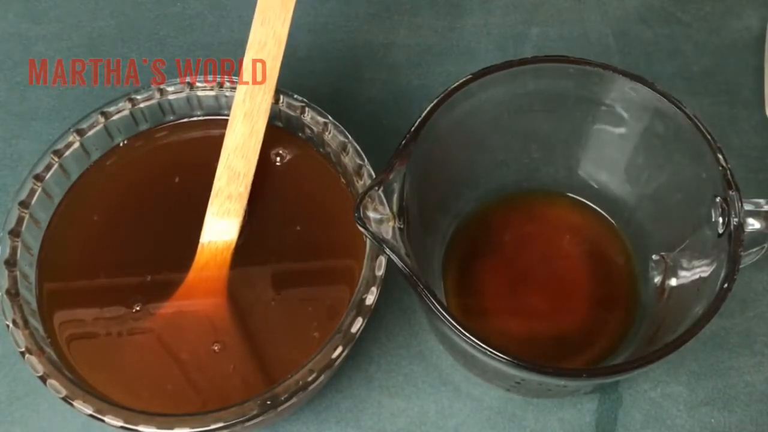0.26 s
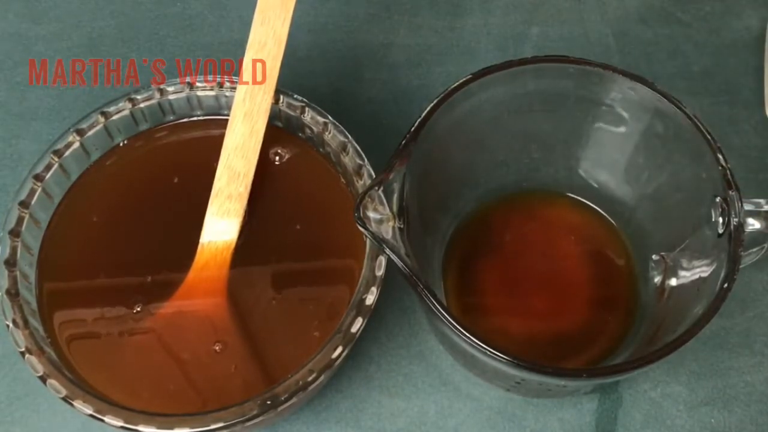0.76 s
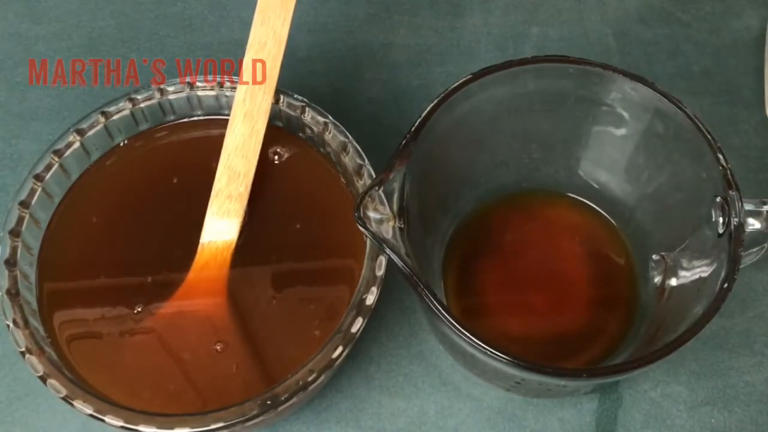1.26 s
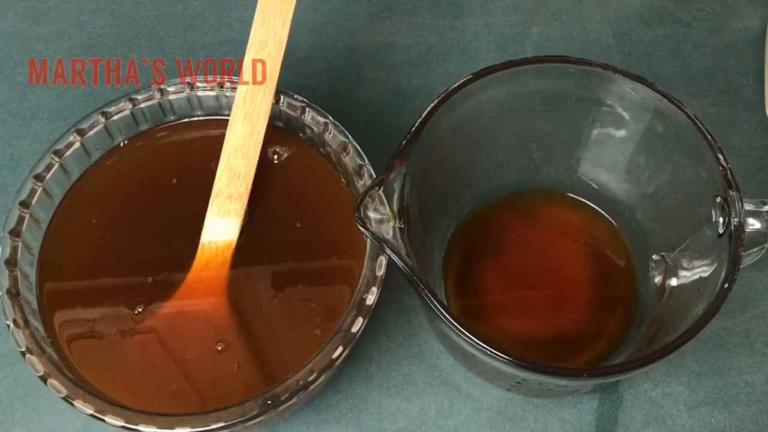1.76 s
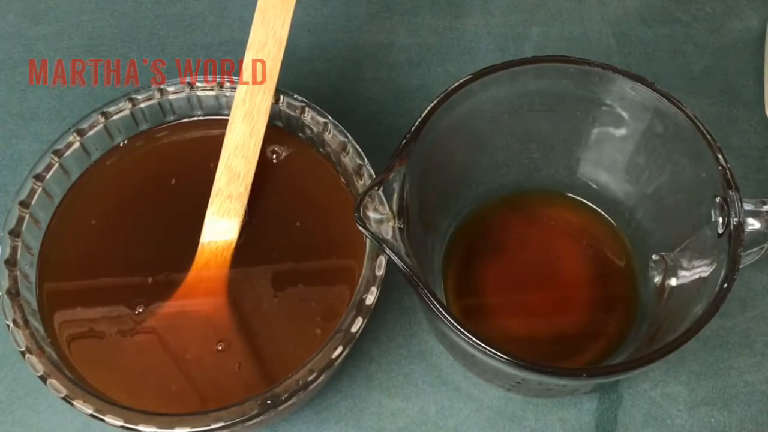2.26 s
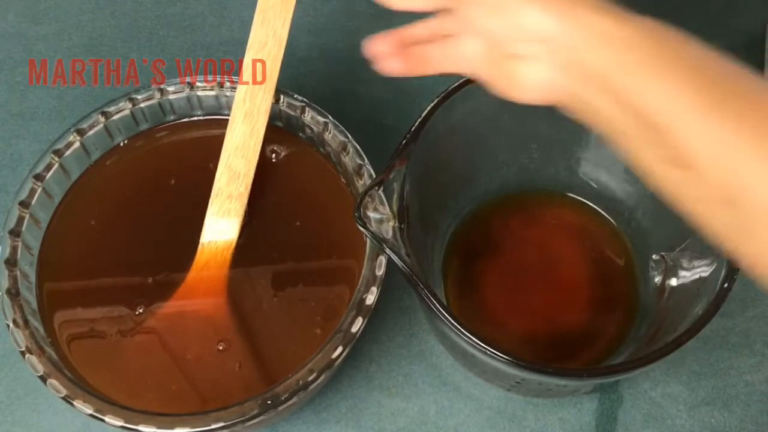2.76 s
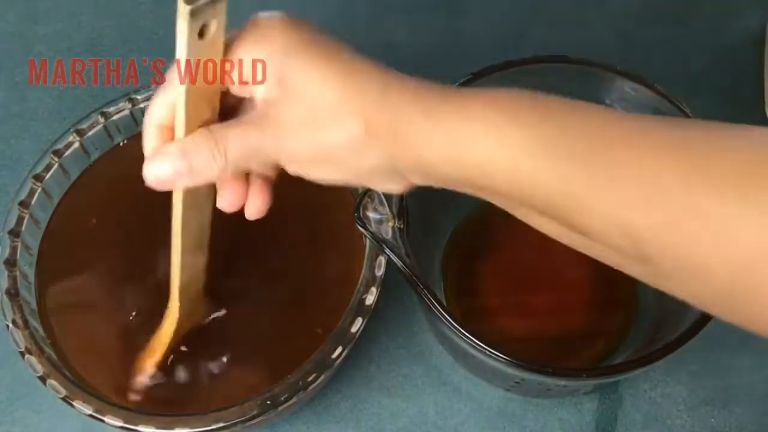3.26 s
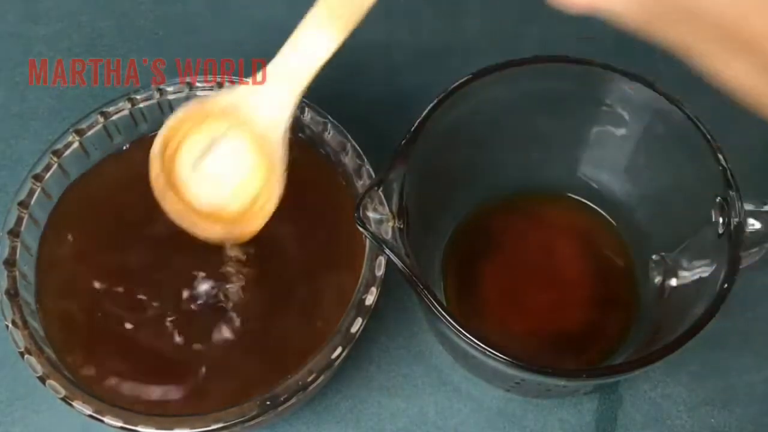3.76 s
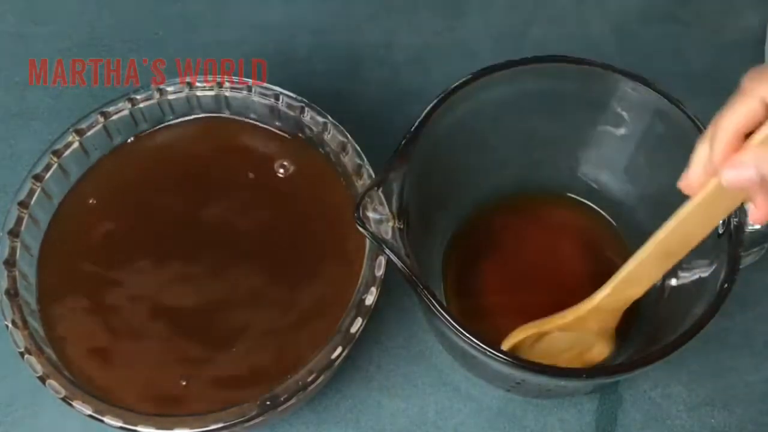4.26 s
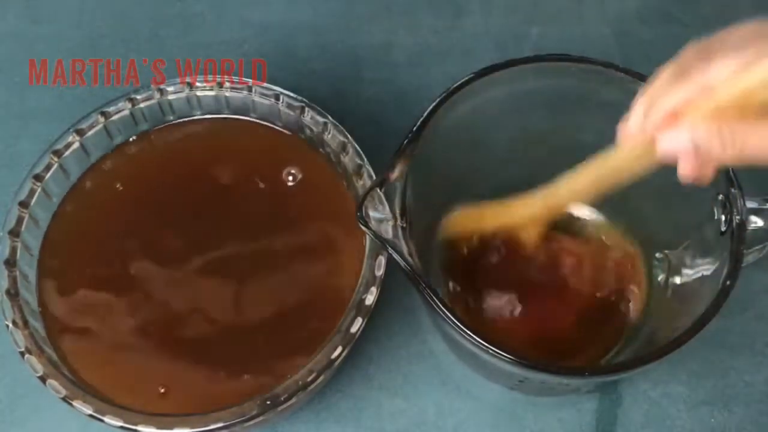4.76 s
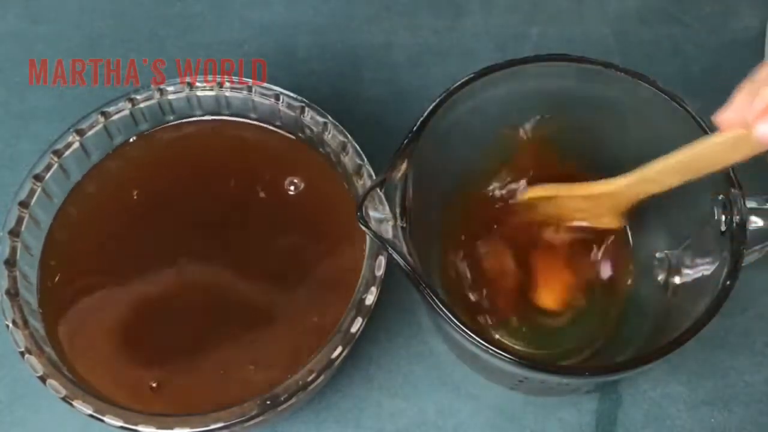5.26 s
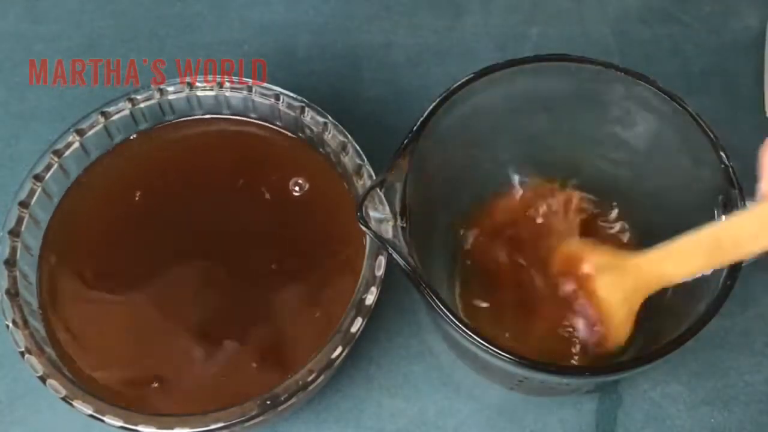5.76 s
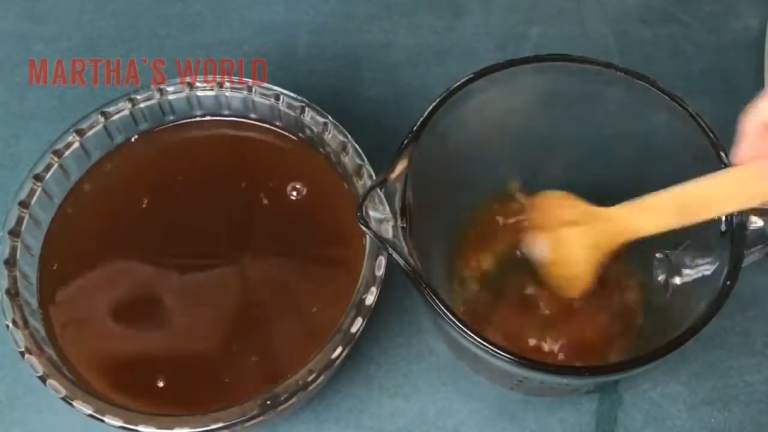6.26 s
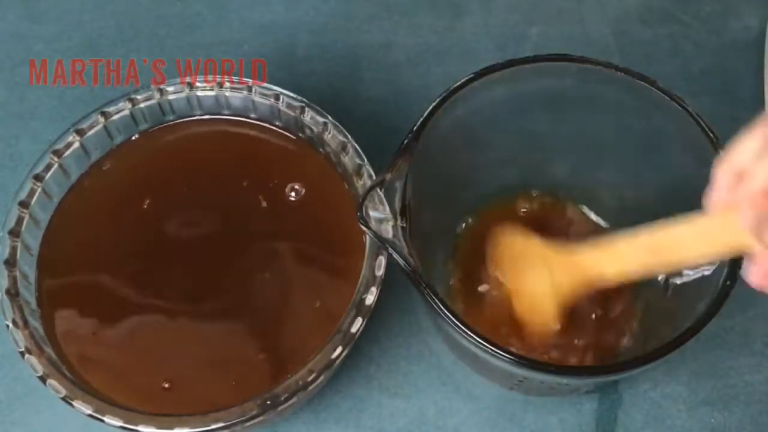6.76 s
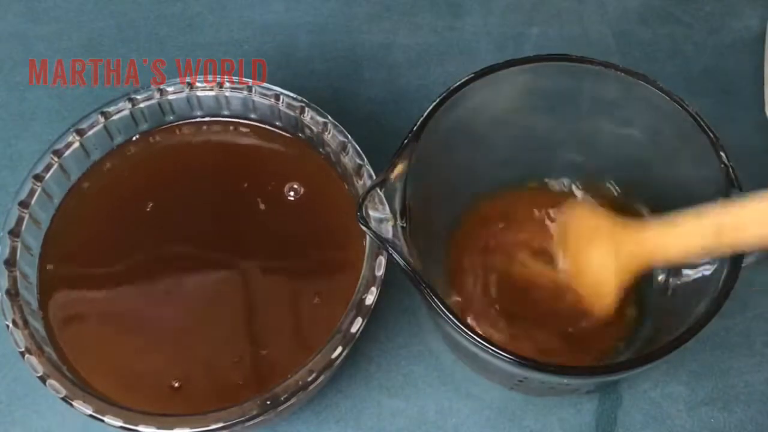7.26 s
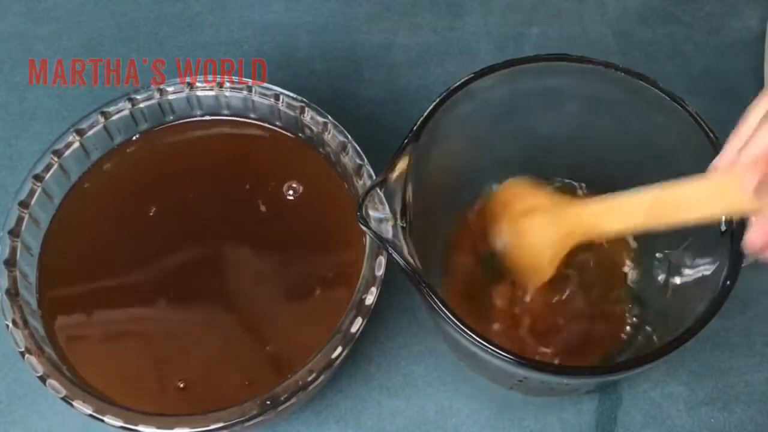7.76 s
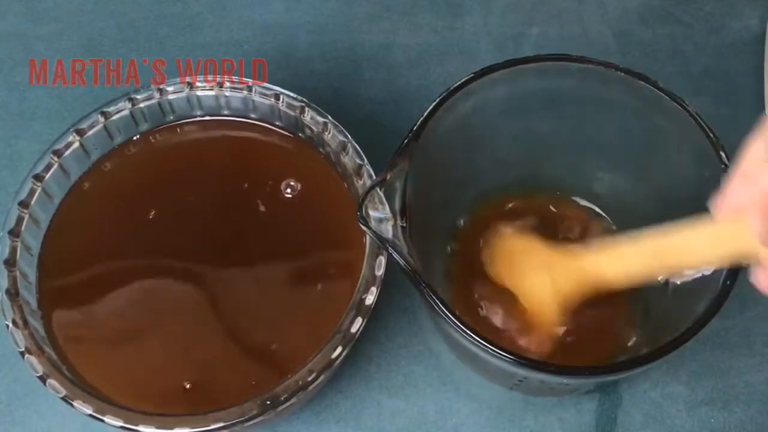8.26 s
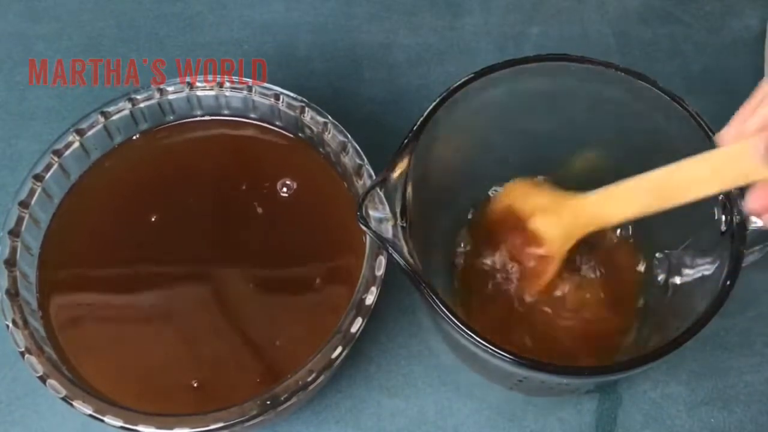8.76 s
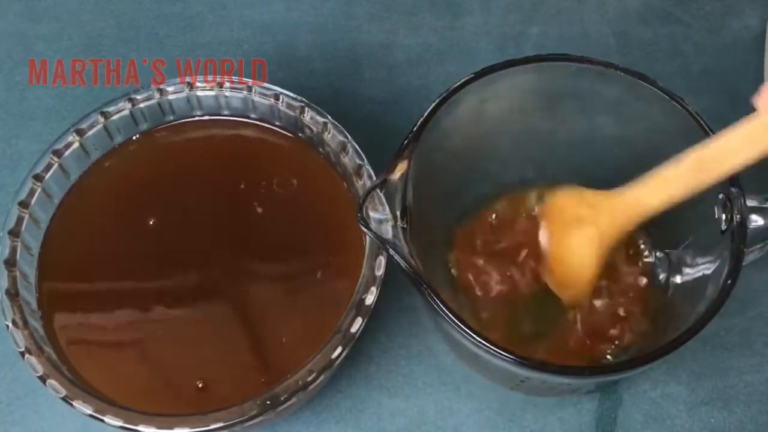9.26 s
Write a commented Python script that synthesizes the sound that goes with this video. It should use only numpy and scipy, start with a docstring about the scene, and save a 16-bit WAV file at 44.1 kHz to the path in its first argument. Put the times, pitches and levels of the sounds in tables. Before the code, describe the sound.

A plastic packet crackles and is put down, then a wooden spoon stirs splashing liquid in a glass jug, knocking the glass with brief clinks.

```python
"""A plastic packet crackles and snaps on a kitchen counter, a little way from the microphone, over a faint
appliance hum. It is put down, and a sleeve swishes as an arm reaches over. Close to the microphone, a
wooden spoon knocks on the bottom of a glass jug and stirs a little liquid: trapped air plops, slaps and
spray ring in the hollow, and twice the spoon judders along the wall and sets the glass ringing."""
import sys
import numpy as np
from scipy import signal
from scipy.fft import rfft, irfft, next_fast_len
from scipy.io import wavfile
from scipy.ndimage import uniform_filter1d, map_coordinates

SR = 44100
rng = np.random.default_rng(int(sys.argv[2]) if len(sys.argv) > 2 else 0)


def wav_record(signal):
    """Record a signal, one row per channel, as 16-bit PCM in the file named by sys.argv[1]."""
    frames = np.transpose(np.atleast_2d(signal))
    bounded = np.clip(frames, -1, 1)
    # unit amplitude maps onto the largest positive 16-bit level
    quanta = np.round(bounded * 32767).astype(np.int16)
    wavfile.write(sys.argv[1], SR, quanta)


N = 419832
TIME = np.arange(N) / SR
AGE, BRIEF = TIME[:SR * 3 // 4], TIME[:SR // 6]  # seconds into a long event and into a short one
TOP_HZ = 16200


def amp(db):
    """Decibels to gain."""
    return 10 ** (np.asarray(db) / 20)


def unit(x):
    """Scale to rms 1."""
    return x / np.sqrt(np.mean(x ** 2) + 1e-20)


def along(points, hz):
    """Interpolate (frequency, value) points on a log frequency axis."""
    knots, values = np.transpose(points)
    return np.interp(np.log(hz + 1), np.log(knots + 1), values)


def level(rows):
    """Gain per sample from (time [s], level [dB]) rows, silent outside them."""
    s, db = np.transpose(rows)
    return amp(np.interp(TIME, s, db)) * (TIME >= s[0]) * (TIME <= s[-1])


def fade(t, t60):
    """Exponential decay that starts at t = 0."""
    return np.exp(-np.log(1000) * np.maximum(t, 0) / t60)


def swell(db, rise, t60):
    """An envelope that climbs to db and dies away."""
    return amp(db) * np.minimum(AGE / rise, 1) * fade(AGE - rise, t60)


def wobble(rate):
    """A smooth random curve, rate knots a second."""
    return map_coordinates(rng.standard_normal(int(N * rate / SR) + 4), [TIME * rate / SR])


def add(track, s, sound):
    """Mix a sound into a track at time s."""
    part = track[max(round(s * SR), 0):][:len(sound)]
    part += sound[:len(part)]


def colour(x, spectrum):
    """Give x a spectrum; rms 1."""
    hz = np.fft.rfftfreq(len(x), 1 / SR)
    return unit(irfft(rfft(x) * amp(along(spectrum, hz)), len(x)))


def noise(spectrum, size=len(AGE)):
    """Fresh coloured noise of rms 1."""
    return colour(rng.standard_normal(next_fast_len(size)), spectrum)[:size]


def band(x, lo_hz, hi_hz):
    """Causal band-pass."""
    return signal.sosfilt(signal.butter(2, [lo_hz, hi_hz], "band", fs=SR, output="sos"), x)


# kitchen air at the microphone: (frequency [Hz], level [dB])
AIR_SPECTRUM = [(20, -26), (60, 2.5), (150, -6), (320, -7), (420, -13), (1000, -18.5), (2260, -28),
                (6720, -35), (16000, -37)]
# tones of an appliance: (frequency [Hz], level [dB])
HUM_TONES = [(64.6, -57), (194.5, -58.5), (237, -63)]

def room_tone(air_db=-50.5):
    """Room air and a slightly unsteady appliance hum lie under everything."""
    hum = sum(amp(db) * np.sqrt(2) * np.sin(2 * np.pi * hz * TIME + 1.78 * wobble(5))
              for hz, db in HUM_TONES)
    return amp(air_db) * noise(AIR_SPECTRUM, N) + hum


# the plastic sheet, and the sharp edge of a snap: (frequency [Hz], level [dB])
SHEET_SPECTRUM = [(100, -0.5), (250, -1), (600, 4.5), (1400, 0.5), (4400, -6), (7200, -10.5), (9000, -18.5),
                  (16000, -36)]
CREASE_SPECTRUM = [(1000, -13), (4000, 15), (8000, -5.5), (16000, -19)]
# the packet rustles in the hand: (time [s], level [dB])
RUSTLE_LEVELS = [(0, -44), (.26, -53), (.46, -38.5), (.8, -45), (1.12, -56), (1.33, -46.5), (1.66, -51.5),
                 (1.76, -33.5), (2.02, -50), (2.4, -54.5)]
# the sheet buckles: (time [s], level [dB], brightness [dB], panel pitch [Hz])
PACKET_SNAPS = [(.032, -20.5, -6.5, 2600), (.044, -23.5, -12.5, 910), (.056, -30, -16.5, 520),
                (.065, -20, -1.5, 1650), (0.121, -16, -6, 625), (0.127, -19.5, -4, 2150),
                (0.153, -21.5, 1, 1080), (0.199, -26, -4, 1260), (.321, -21, -4.5, 1330),
                (.343, -26, 1, 1170), (0.41, -20.5, 4.5, 2000), (.439, -14.5, -9.5, 1680),
                (0.465, -27, -16.5, 1140), (.492, -15, -3.5, 694), (0.561, -20.5, 10, 1160),
                (.633, -25.5, -7, 1200), (0.726, -16.5, -9, 1160), (0.738, -21, 5, 1510),
                (.746, -11, 8.5, 1950), (0.763, -13.5, -6, 920), (.876, -18.5, 19, 2010),
                (0.898, -9, 2, 2000), (.949, -2.5, 3.5, 554), (1.027, -18, -4, 2450),
                (1.14, -19, 9.5, 2100), (1.247, -18.5, 9.5, 3930), (1.339, -30.5, 2, 3070),
                (1.5, -41.5, -23, 600), (1.562, -22.5, -3, 670), (1.599, -22, -4.5, 1280),
                (1.968, -30, -7.5, 650), (2.191, -30, -7.5, 1200)]

def packet_crackle(snap_db=-9, rustle_db=-5, grit_db=4):
    """Stiff plastic buckles and rustles on: a tight crease cracks brightly, a wide panel knocks."""
    snaps, settling = np.zeros((2, N))
    mean_db = np.mean([row[1] for row in PACKET_SNAPS])
    for s, db, bright_db, hz in PACKET_SNAPS:
        sheet = noise(SHEET_SPECTRUM, len(BRIEF))
        body = amp(-10 - bright_db) * unit(band(sheet, 130, 710)) * fade(BRIEF, 0.12)
        snap = unit(band(sheet, 660, 4230)) * fade(BRIEF, 0.055)
        crack = amp(bright_db - 5) * unit(band(sheet, 2290, 12400)) * fade(BRIEF, 0.04)
        tick_db = 0.38 * (db - mean_db) + bright_db / 2  # harder snaps are sharper
        tick = amp(tick_db) * noise(CREASE_SPECTRUM, len(BRIEF)) * fade(BRIEF, 0.0011)
        panel = amp(-5.5) * unit(band(sheet, hz / 1.4, hz * 1.4)) * fade(BRIEF, 0.061)
        add(snaps, s, amp(db + snap_db) * (body + snap + crack + tick + panel))
        add(settling, s, swell(db - 28, rise=0.017, t60=0.084))
    rustle = np.hypot(amp(rustle_db) * level(RUSTLE_LEVELS), settling)
    return snaps + rustle * noise(SHEET_SPECTRUM, N) * unit(amp(grit_db * wobble(120)))


# sliding plastic: (frequency [Hz], level [dB])
HISS_SPECTRUM = [(1500, -33), (3000, 3), (7000, 0.5), (9000, -4.5), (14000, -7), (16000, -4)]
# the packet rubs on the counter: (time [s], level [dB], pitch [Hz], length [s], relative hiss [dB])
PACKET_RUBS = [(0.395, -40, 1450, 0.18, -18), (0.432, -56, 580, 0.18, 4), (0.634, -40, 1540, 0.11, -4.5),
               (1.243, -48.5, 4000, 0.052, 8), (1.753, -35.5, 3360, 0.05, -10),
               (1.874, -39.5, 2500, 0.087, -7), (2.061, -40, 1600, 0.081, -15)]

def packet_rubs():
    """Friction sings in a narrow band over a fine hiss."""
    out = np.zeros(N)
    for s, db, hz, length, hiss_db in PACKET_RUBS:
        friction = unit(band(noise(SHEET_SPECTRUM), hz / 1.31, hz * 1.32))
        stroke = np.sin(np.pi * np.minimum(AGE / length, 1))
        add(out, s, amp(db) * stroke * (friction + amp(hiss_db) * noise(HISS_SPECTRUM)))
    return out


# the packet's thump on the counter: (frequency [Hz], level [dB])
THUMP_SPECTRUM = [(25, -10), (85, 5), (130, 1.5), (300, -4.5), (750, -7), (1200, -29)]
# it is put down: (time [s], thump level [dB], thump t60 [s], crunch level [dB], crunch t60 [s])
PACKET_LANDING = [(1.712, -21.5, 0.25, -22.5, 0.27)]

def packet_landing():
    """The packet lands with a thump and a crunch of its contents."""
    out = np.zeros(N)
    for s, thump_db, thump_t60, crunch_db, crunch_t60 in PACKET_LANDING:
        add(out, s, swell(thump_db, 0.0014, thump_t60) * noise(THUMP_SPECTRUM))
        crunch = unit(band(noise(SHEET_SPECTRUM), 1850, 15000))
        add(out, s, swell(crunch_db, 0.00089, crunch_t60) * crunch)
    return out


# sliding cloth: (frequency [Hz], level [dB])
CLOTH_SPECTRUM = [(410, 2), (700, -9), (1200, -4), (2000, 1.5), (2400, -1.5), (16000, -12)]
# the arm moves, back from the microphone: (time [s], level [dB], rise [s], t60 [s])
ARM_MOVES = [(2.4, -53, 0.11, 3.2), (2.75, -41, 0.25, 0.35), (3.07, -57.5, 0.068, 0.63),
             (3.32, -51, 0.097, 0.8)]

def sleeve(gain_db=-1):
    """Cloth slides each time the arm moves over the counter."""
    slide = np.zeros(N)
    for s, db, rise, t60 in ARM_MOVES:
        add(slide, s, swell(db + gain_db, rise, t60))
    return slide * noise(CLOTH_SPECTRUM, N)


def bubble(hz, glide, t60, flutter=0.055, flicker_db=2):
    """A trapped bubble rings briefly, its pitch gliding unsteadily as it nears the surface."""
    t = AGE[:int(2 * t60 * SR)]
    shape = fade(t, t60) * (1 - np.exp(-t / (0.072 * t60)))
    quiver = np.interp(t, np.linspace(0, AGE[-1], 800), rng.standard_normal(800))
    pitch = hz * (1 + glide * np.minimum(t, 0.51 * t60))  # the glide ends at the surface
    phase = 2 * np.pi * np.cumsum(pitch * (1 + flutter * quiver)) / SR
    return shape / shape.max() * amp(flicker_db * np.tanh(quiver)) * np.sin(phase)


# air trapped by the spoon: (time [s], level [dB], pitch [Hz], relative glide [1/s], t60 [s])
AIR_POCKETS = [(3.201, -39, 502, 0.5, 0.078), (4.628, -31, 1810, 2, 0.015),
               (4.694, -24.5, 6260, -2, 0.0054), (4.779, -27.5, 529, 1.5, 0.05), (4.78, -40, 1220, 0, 0.05),
               (4.802, -38, 1230, -1, 0.06), (4.864, -17.5, 1917, 15, 0.029),
               (4.867, -21.5, 2444, 4, 0.076), (5.134, -42, 2420, 1, .035), (5.336, -35.5, 497, 8, 0.027),
               (5.755, -26, 2980, 8, .018), (5.789, -30.5, 2180, -7, .014),
               (5.792, -27.5, 1660, -10, 0.027), (5.868, -26, 5930, -4, 0.0089),
               (6.007, -18, 1334, 0.5, 0.1), (6.033, -23.5, 3920, 11, 0.019),
               (6.077, -23.5, 1220, 2, 0.046), (6.209, -24.5, 4480, 7.5, 0.024),
               (6.286, -28, 1218, 4.5, 0.1), (6.595, -26.5, 3960, 1, 0.022),
               (6.603, -25.5, 5750, 14, 0.018), (6.877, -36, 1570, 5.5, 0.15),
               (6.978, -33.5, 1450, 15, 0.037), (7.396, -27, 2720, 1, 0.036),
               (7.427, -24.5, 5040, 12, 0.014), (7.736, -31, 4030, 7, .015), (8.032, -35, 1580, 2, 0.034),
               (8.118, -36.5, 1375, 7, 0.032), (8.804, -34, 1470, 5, 0.04), (8.851, -13, 3780, 14, 0.0078),
               (8.855, -23, 1563, 6, 0.028), (8.908, -28, 1830, 9, 0.025), (9.099, -28.5, 4020, -8, 0.015),
               (9.432, -18.5, 3220, 23, 0.016), (9.431, -16, 1850, 4, 0.01)]

def bubbles(plop_db=-1, gurgle_hz=2400, spread_octaves=1.172, ring_cycles=64):
    """Large bubbles plop singly; each slap drives three small ones under, and more gurgle in the flow."""
    out, strength, small = np.zeros(N), flow(), []
    for s, db, hz, glide, t60 in AIR_POCKETS:
        add(out, s, amp(db + plop_db) * bubble(hz, glide, t60))
    for s, db, hz in LIQUID_SLAPS:
        gain = amp(min(db - 8, -31))
        for when, pitch, size, climb in rng.random((3, 4)):
            small.append((s + when * 0.022, gain, hz * 2 ** (pitch - 0.7), size, climb))
    stir_start = STIR_LEVELS[0][0]
    for when, pitch, size, climb in rng.random((130, 4)):
        s = stir_start + when * (TIME[-1] - stir_start)
        hz = gurgle_hz * 2 ** (spread_octaves * (2 * pitch - 1))
        small.append((s, strength[int(s * SR)] * amp(8), hz, size, climb))
    for s, gain, hz, size, climb in small:
        t60 = ring_cycles / hz
        add(out, s, gain * amp(8 * size - 16) * bubble(hz, 0.52 * climb / t60, t60))
    return out


# a slap of liquid, and its sharp edge: (frequency [Hz], level [dB])
SLAP_SPECTRUM = [(700, -55), (1500, -3), (3500, -0.5), (6500, 1), (8000, -0.5), (12000, 0), (16000, -38)]
TICK_SPECTRUM = [(1000, -36), (4000, -1.5), (10000, -2.5), (16000, -4)]
# liquid hits spoon and glass, close to the microphone: (time [s], level [dB], cavity pitch [Hz])
LIQUID_SLAPS = [(3.7293, -34.5, 4800), (4.5492, -31, 2900), (4.6933, -32, 6600), (4.82, -36, 2470),
                (4.8534, -16, 2680), (5.1008, -32, 3500), (5.1806, -33, 4300), (5.2395, -32, 4100),
                (5.484, -36, 4640), (5.626, -27, 7100), (5.674, -23, 6940), (5.7537, -17.5, 3240),
                (5.7844, -28, 4640), (5.8438, -36, 3600), (5.8659, -14.5, 6200), (6.0074, -18.5, 2800),
                (6.0318, -24.5, 4020), (6.0806, -34, 4440), (6.1484, -24.5, 4850), (6.2092, -26, 4530),
                (6.3014, -22.5, 2630), (6.331, -30, 3540), (6.4474, -29.5, 6150), (6.4787, -31.5, 3560),
                (6.5939, -28, 4100), (6.6655, -25.5, 3270), (6.789, -22.5, 3500), (6.8646, -28.5, 3920),
                (6.9272, -26, 4800), (7.008, -28, 9100), (7.0678, -26, 3370), (7.104, -26, 3830),
                (7.1373, -26.5, 3510), (7.1738, -30, 3280), (7.1998, -24.5, 3240), (7.2476, -28.5, 3840),
                (7.2654, -24.5, 4730), (7.3037, -26, 4700), (7.3387, -26.5, 6000), (7.3964, -28, 2730),
                (7.419, -23, 6540), (7.443, -24, 4460), (7.4654, -32, 6860), (7.5064, -29.5, 4070),
                (7.5545, -30, 4300), (7.5677, -21, 4950), (7.6238, -24, 5400), (7.7354, -23, 2800),
                (7.8212, -30, 4100), (7.8507, -27, 3620), (7.8694, -29.5, 4850), (7.9858, -23, 2680),
                (8.1329, -26, 4060), (8.1678, -27, 3430), (8.255, -30.5, 3470), (8.2823, -29, 3680),
                (8.3644, -29, 3600), (8.418, -30.5, 2870), (8.4552, -26.5, 6700), (8.5535, -26.5, 5900),
                (8.57, -34, 3350), (8.6775, -37, 4660), (8.7503, -35, 3960), (8.7754, -20, 7900),
                (8.9385, -30, 2700), (9.0308, -11.5, 2890), (9.182, -13.5, 5470), (9.2094, -24, 3380),
                (9.3807, -20.5, 5160), (9.43, -20, 3360), (9.45, -22, 3940), (9.4883, -21, 7150)]

def splashes(splash_db=-9, cavity_db=-10.5, tick_db=-9.5):
    """Each slap ticks, sounds a small cavity and throws more spray; slaps and spray ring in the jug."""
    slaps, ticks, thrown = np.zeros((3, N))
    mean_db = np.mean([row[1] for row in LIQUID_SLAPS])
    attack = np.minimum(BRIEF / 0.00099, 1)
    decay = fade(BRIEF, 0.012) + 0.14 * fade(BRIEF, 0.05)
    for s, db, hz in LIQUID_SLAPS:
        burst = noise(SLAP_SPECTRUM, len(BRIEF))
        cavity = unit(band(burst, hz / 1.11, hz * 1.11)) * fade(BRIEF, 0.015)
        add(slaps, s, amp(db) * attack * (amp(splash_db) * burst * decay + amp(cavity_db) * cavity))
        tick = noise(TICK_SPECTRUM, len(BRIEF)) * fade(BRIEF, 0.0069)
        add(ticks, s, amp(db + tick_db + 0.47 * (db - mean_db)) * tick)  # harder slaps are sharper
        add(thrown, s, swell(db - 18, rise=0.0053, t60=0.092))
    return hollow(slaps + spray(thrown)) + ticks


# air modes of the jug above the liquid: (frequency [Hz], width [Hz], level [dB])
HOLLOW_MODES = [(1304, 69, 10), (1510, 75, 1.5), (1947, 39, 6), (2530, 460, -1), (3256, 160, 0),
                (3540, 134, 1.5), (4150, 1040, -2.5), (4940, 47, -12), (6150, 230, -0.5), (6740, 127, 1)]

def hollow(x, strong_db=4, weak_count=48):
    """The hollow of the jug rings briefly: a few strong modes among many weak ones."""
    strong = sum(amp(db) * signal.lfilter(*signal.iirpeak(hz, hz / width, fs=SR), x)
                 for hz, width, db in HOLLOW_MODES)
    slots = (np.arange(weak_count) + rng.random(weak_count)) / weak_count
    weak_hz = 1800 + 8500 * slots ** 1.3
    cycles = np.outer(BRIEF, weak_hz) + rng.random(weak_count)
    tail = np.sin(2 * np.pi * cycles).sum(axis=1) * fade(BRIEF, 0.15)
    weak = signal.fftconvolve(x, tail / np.linalg.norm(tail))[:N]
    return 0.55 * x + 0.42 * weak + amp(strong_db) * strong


# droplets and wash in the jug: (frequency [Hz], level [dB])
SPRAY_SPECTRUM = [(350, 1), (600, 3), (869, -12), (3530, -6.5), (5630, -6), (7200, -11), (8860, -5.5),
                  (10600, -11), (16000, -6.5)]

def spray(thrown, drops_per_s=3500, gain_db=-6):
    """Droplets fall over a wash, following the stirring and the envelope of what the slaps throw up."""
    drops = colour(rng.standard_normal(N) * (rng.random(N) < drops_per_s / SR), SPRAY_SPECTRUM)
    wash = slosh(noise(SPRAY_SPECTRUM, N))
    return amp(gain_db) * np.hypot(flow() * patter(), thrown) * (drops + wash)


def slosh(x, patchy_db=4):
    """The moving surface keeps shifting the resonances of a sound; rms 1."""
    spectra = signal.stft(x, nperseg=512)[2]
    patches = rng.standard_normal(spectra.shape)
    for axis in (0, 1):
        patches = uniform_filter1d(patches, size=6, axis=axis)
    return unit(signal.istft(spectra * amp(patchy_db * unit(patches)), nperseg=512)[1][:N])


# modes of the jug with the spoon in it, and of the counter under it:
# (frequency [Hz], t60 [s], level for a bottom strike [dB], level for a wall strike [dB])
JUG_MODES = [(601, .2, -42, -25), (700, .16, -28, -31), (993, .13, -36, -24), (1180, .13, -31, -25),
             (1355, .06, -12, -22), (1500, .016, -5, -20), (1571, .2, -31, -23), (1658, .63, -27.5, -15.5),
             (1889, .06, -16, -20), (2550, .04, -24, -36), (2893, .22, -46, -23.5), (3043, .18, -36, -29),
             (5310, .12, -45, -38), (5740, .15, -43, -35), (6120, .13, -46, -33), (6950, .12, -58, -41),
             (8553, .13, -70, -35)]
COUNTER_MODES = [(62, 0.47, -22, -6.5), (139.5, 0.2, -12, -8), (242.4, 0.16, -6.5, -8.5),
                 (535, .07, -21, -12)]
# the wood's dull knock, and its scrape: (frequency [Hz], level [dB])
THUD_SPECTRUM = [(25, -30), (50, -2), (100, -2.5), (200, 8), (350, -0.5), (500, 9), (1100, -9.5),
                 (1500, -21.5)]
SCRAPE_SPECTRUM = [(300, -64), (800, 9), (1600, 22.5), (2900, 10), (4200, -6.5), (6000, -8), (9000, -35),
                   (16000, -68)]
# spoon on glass, close up: (time [s], ring [dB], height on the wall [0-1], drag [s], thud [dB], scrape [dB])
SPOON_KNOCKS = [(4.1447, 1.5, 0.02, 0.0013, -24, -16), (4.475, -12.5, 0.06, 0.0032, -30, -25.5),
                (4.778, -39, 0, 0.0037, -28.5, -56), (4.802, -34, 0.6, .005, -35.5, -52),
                (5.336, -60, 0.4, 0.004, -35.5, -61), (5.357, -51, .2, 0.0061, -41.5, -58),
                (6.665, -41, 0.4, 0.0095, -37, -45), (7.566, -18, 0.97, 0.013, -25.5, -34.5),
                (8.851, -16, 0.8, 0.00099, -40, -20.5), (8.945, -24, 1, 0.027, -25, -27),
                (8.978, -1, 0.5, 0.00048, -51, -9), (8.981, 5, 0.97, 0.0095, -19, -14.5),
                (9.222, -11.5, 0.83, 0.004, -19.5, -25), (9.245, -8, 0.94, 0.0073, -16, -26),
                (9.288, -8, 0.77, 0.0018, -23, -41)]
# wet wood sticks and slips on the wall: (time [s], pitch [Hz], level [dB], rise [s], t60 [s])
SPOON_SQUEAKS = [(8.977, 2897, -17.5, 0.0056, 0.2), (8.984, 579, -15, .01, 0.048),
                 (8.9894, 1707, -4.5, 0.02, 0.17), (9.248, 565, -21, 0.0086, 0.038),
                 (9.267, 1714, -27, 0.017, 0.27)]

def spoon_on_glass(wood_db=-4):
    """Each contact pumps the jug's modes for as long as the spoon drags, and thumps the counter."""
    ring, knock = np.zeros((2, N))
    push = np.minimum(AGE / 0.0072, 1)
    for s, ring_db, height, drag, thud_db, scrape_db in SPOON_KNOCKS:
        pump = np.minimum(AGE / drag, 1)
        bodies = (ring, JUG_MODES, ring_db, pump), (knock, COUNTER_MODES, thud_db, push)
        for track, modes, db, attack in bodies:
            for hz, t60, bottom_db, wall_db in modes:
                strength = amp(db + bottom_db + height * (wall_db - bottom_db))
                add(track, s, strength * attack * fade(AGE - drag, t60) * np.sin(2 * np.pi * hz * AGE))
        add(knock, s, amp(thud_db + wood_db) * noise(THUD_SPECTRUM) * push * fade(AGE - drag, 0.1))
        add(knock, s, amp(scrape_db) * noise(SCRAPE_SPECTRUM) * fade(AGE - drag, 0.013))
    for s, hz, db, rise, t60 in SPOON_SQUEAKS:
        add(ring, s, swell(db, rise, t60) * np.sin(2 * np.pi * hz * AGE))
    return band(ring, 110, TOP_HZ), band(knock, 39, 8600)


# vigour of the stirring: (time [s], level [dB])
STIR_LEVELS = [(4.35, -66), (4.44, -51), (4.72, -74), (5.2, -50.5), (5.42, -69), (5.55, -48), (5.75, -62),
               (6.3, -49), (6.74, -56), (7.15, -48.5), (7.37, -57.5), (7.46, -49), (7.96, -51.5),
               (8.15, -50), (8.64, -57.5), (8.95, -37), (9.2, -46.5), (9.52, -49)]

def flow(gain_db=5.5, stroke_s=0.142, dip_at_s=8.003, ripple_db=0.5):
    """The liquid surges with the vigour of the stirring and ripples slightly twice a stroke; an envelope."""
    turn = 2 * np.pi * (TIME - dip_at_s) / stroke_s
    return level(STIR_LEVELS) * amp(gain_db - ripple_db * np.cos(2 * turn))


def patter(ticks_per_s=55, spread_db=3, t60=0.059, floor=0.16):
    """The flow breaks into small wet ticks, each sudden and quick to die; an envelope of rms 1."""
    onsets = rng.random(N) < ticks_per_s / SR
    strikes = onsets * amp(spread_db * np.clip(rng.standard_normal(N), -2, 2))
    power = np.abs(signal.fftconvolve(strikes ** 2, fade(BRIEF, t60) ** 2)[:N])
    return unit(np.sqrt(power / power.mean() + floor ** 2))


# troughs behind the spoon: (time [s], level [dB], first pitch [Hz], last pitch [Hz], length [s])
TROUGHS = [(4.548, -38.5, 2300, 3920, 0.029), (5.454, -47.5, 1930, 3300, 0.038),
           (5.599, -30, 1043, 2370, 0.05), (6.293, -29.5, 1226, 3430, 0.042),
           (9.136, -30.5, 2310, 4100, 0.01), (9.183, -26, 1880, 3740, .022)]

def bloops(flutter=0.055, flicker_db=4):
    """A trough closes unevenly and sounds for as long as it shrinks, its pitch climbing."""
    out = np.zeros(N)
    for s, db, first_hz, last_hz, length in TROUGHS:
        closed = AGE[:int(length * SR)] / length
        pitch = first_hz * (last_hz / first_hz) ** closed
        shape = np.sqrt(np.interp(closed, [0, 0.1, 1], [0, 1, 0]))
        quiver = np.interp(closed, np.linspace(0, 1, 14), rng.standard_normal(14))
        phase = 2 * np.pi * np.cumsum(pitch * (1 + flutter * quiver)) / SR
        add(out, s, amp(db + flicker_db * np.tanh(quiver)) * shape * np.sin(phase))
    return out


# surfaces near the microphone: (delay [s], gain [ratio])
REFLECTIONS = [(.0058, 0.076), (.0079, 0.053), (0.0105, .2)]

def echoes(x):
    """The direct sound with its first reflections from the counter and wall."""
    out = x.copy()
    for delay, gain in REFLECTIONS:
        add(out, delay, gain * x)
    return out


# reverberation of the kitchen: (frequency [Hz], t60 [s])
KITCHEN_DECAY = [(100, 0.58), (1000, 0.59), (4000, 0.36), (14000, 0.24)]

def room(x):
    """The kitchen's diffuse answer, shorter in the treble."""
    hz, t, spectra = signal.stft(rng.standard_normal(SR // 2), SR, nperseg=256)
    tail = signal.istft(spectra * fade(t, along(KITCHEN_DECAY, hz)[:, None]), SR, nperseg=256)[1]
    tail *= np.minimum(TIME[:len(tail)] / 0.0015, 1)
    return signal.fftconvolve(x, tail / np.linalg.norm(tail))[:N]


def scene():
    """One microphone at the counter: the jug stands close, packet and sleeve are further off."""
    ring, knock = spoon_on_glass()
    stirring = knock + bubbles() + bloops() + splashes()
    packet = packet_crackle() + packet_rubs() + packet_landing()
    jug = ring + amp(-18) * room(ring)
    near = jug + amp(0.5) * echoes(stirring) + amp(-12.5) * room(stirring)
    far = packet + amp(-11) * room(packet) + sleeve()
    return (near + far + room_tone())[None]


def record(dry):
    """The recorder keeps nothing above its band limit."""
    size = next_fast_len(N + SR // 2)
    passed = np.clip((TOP_HZ - np.fft.rfftfreq(size, 1 / SR)) / 500, 0, 1)
    return irfft(rfft(dry, size) * passed, size)[:, :N]


dry = scene()
out = record(dry)
wav_record(out)
```